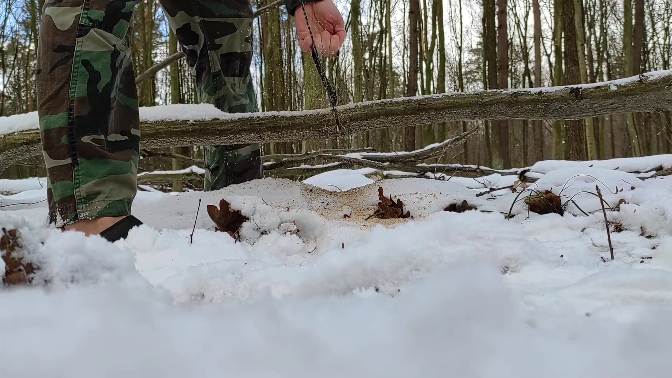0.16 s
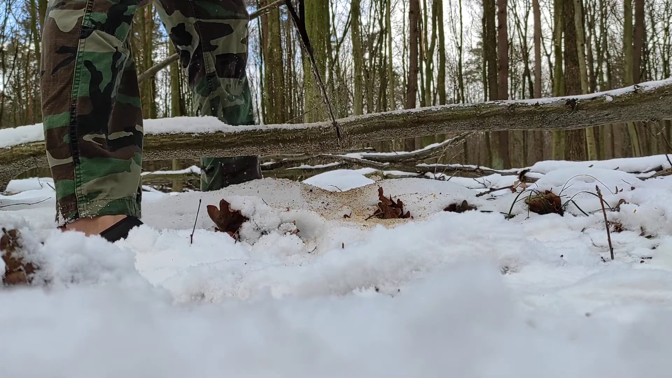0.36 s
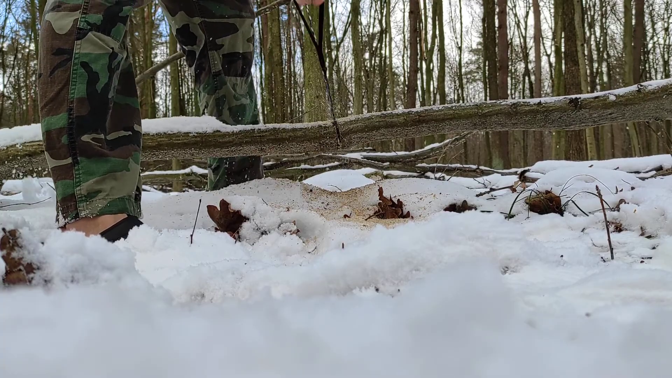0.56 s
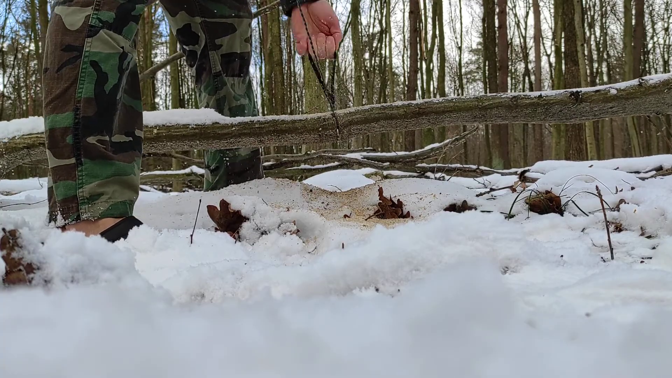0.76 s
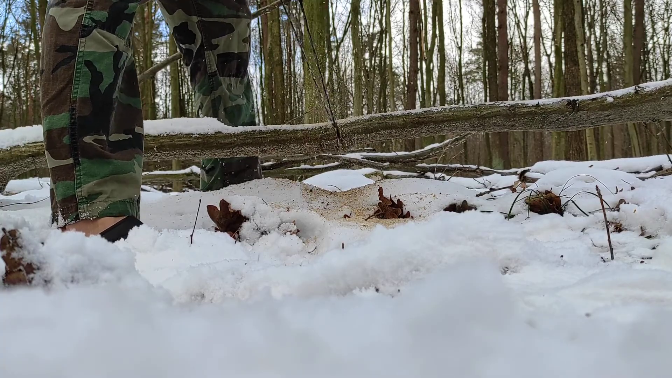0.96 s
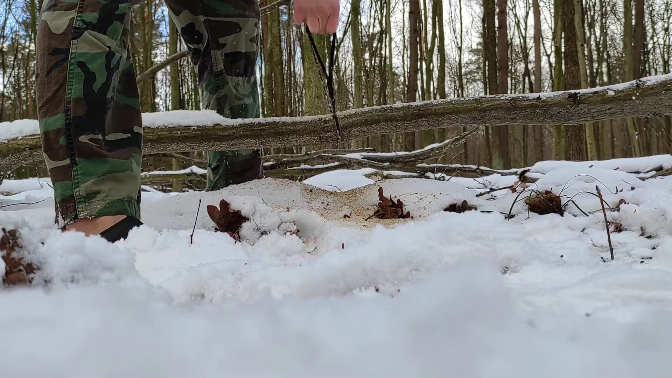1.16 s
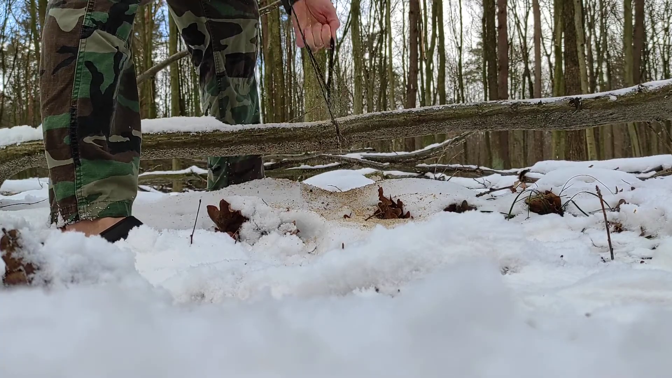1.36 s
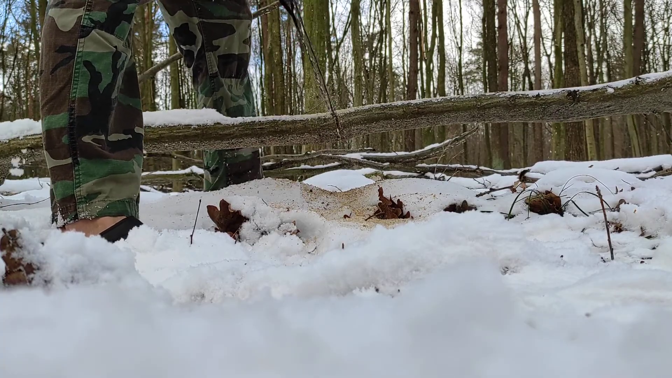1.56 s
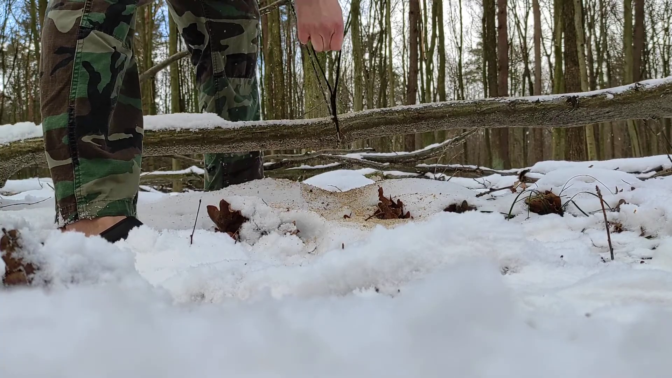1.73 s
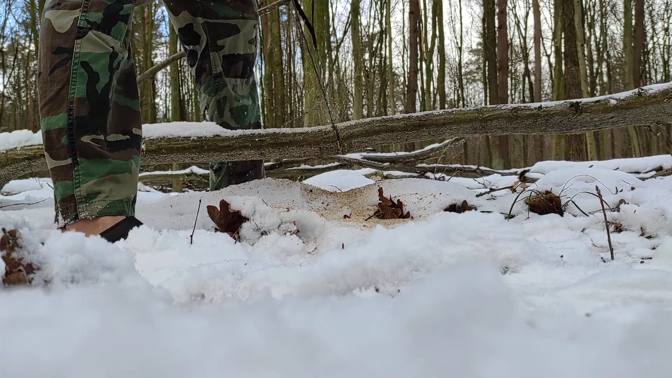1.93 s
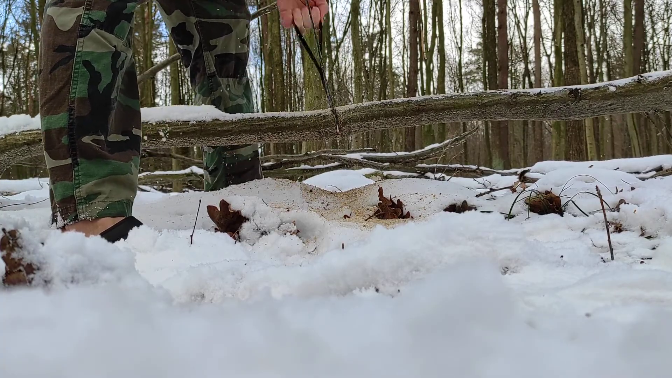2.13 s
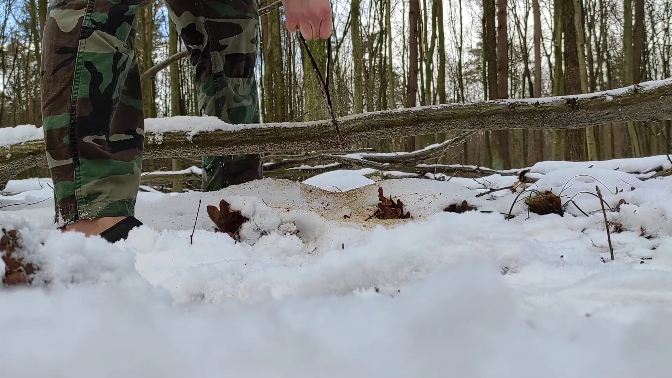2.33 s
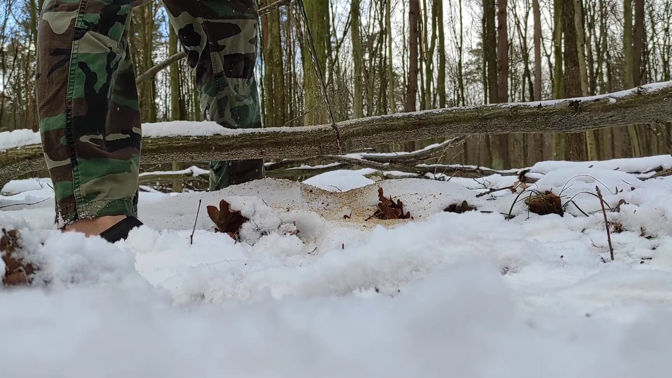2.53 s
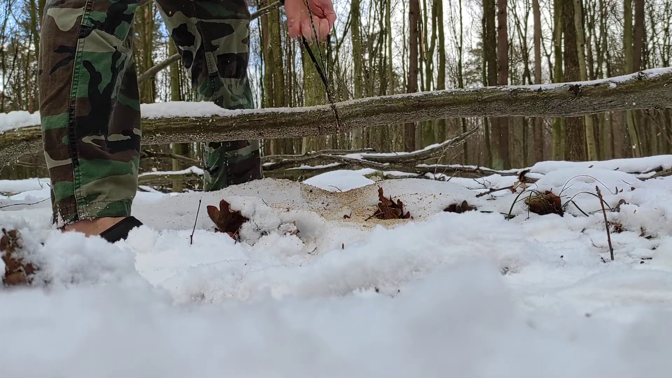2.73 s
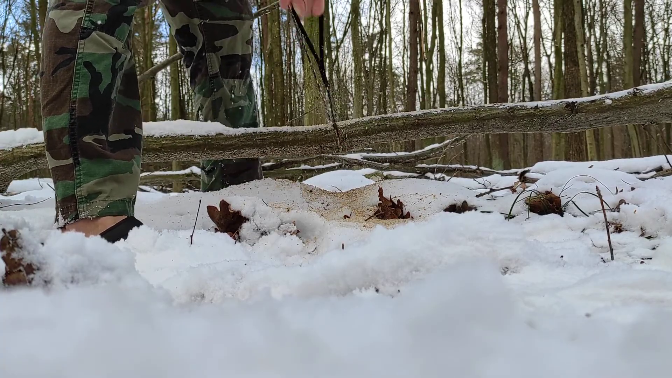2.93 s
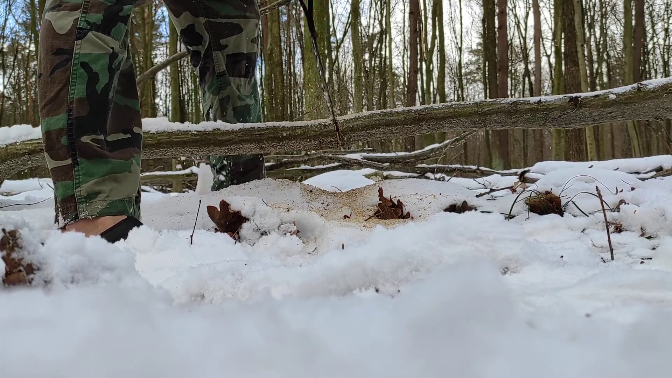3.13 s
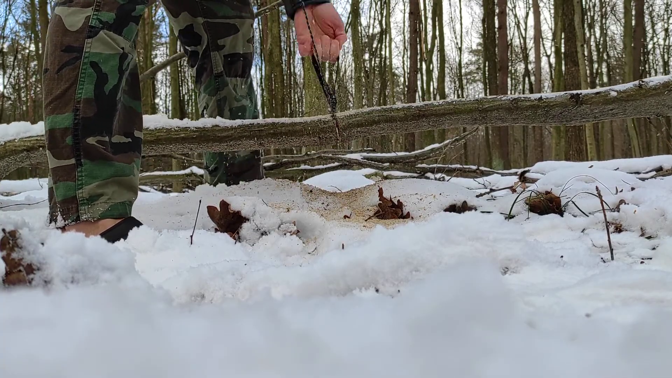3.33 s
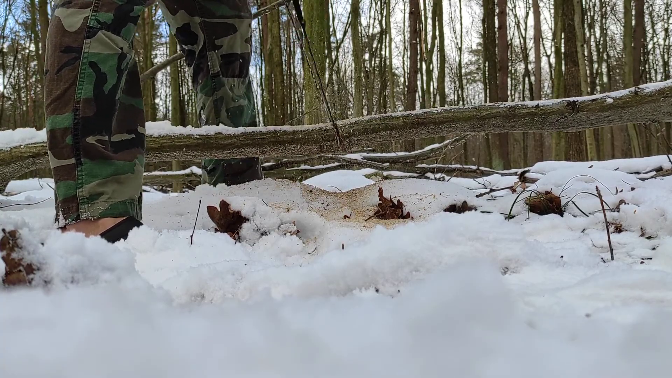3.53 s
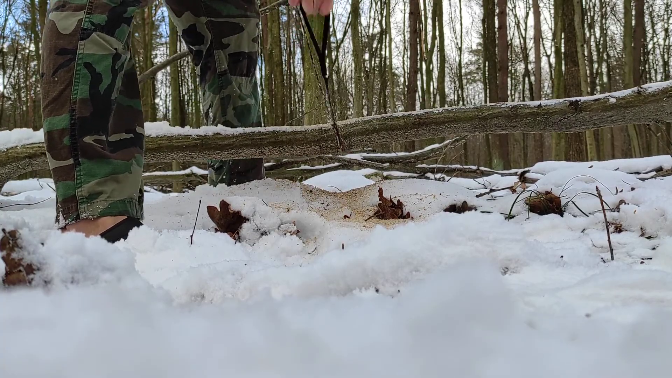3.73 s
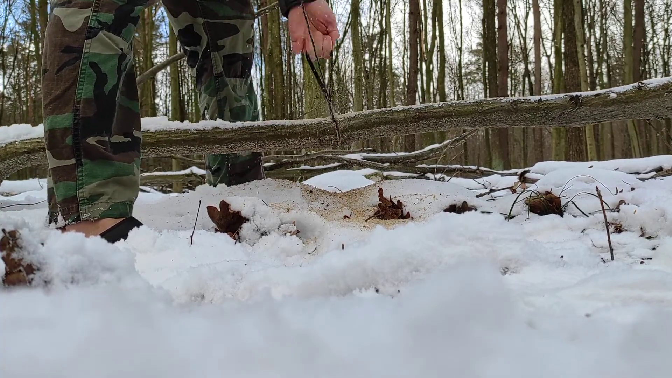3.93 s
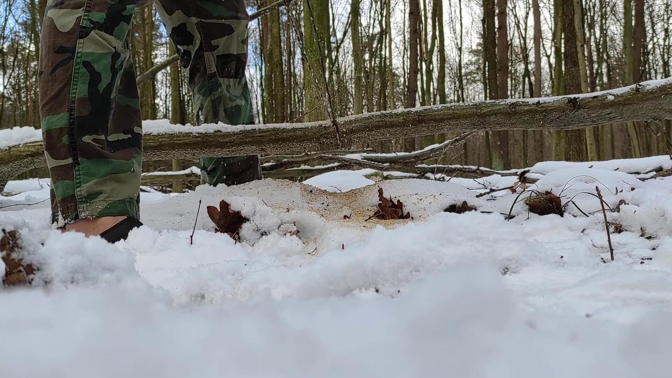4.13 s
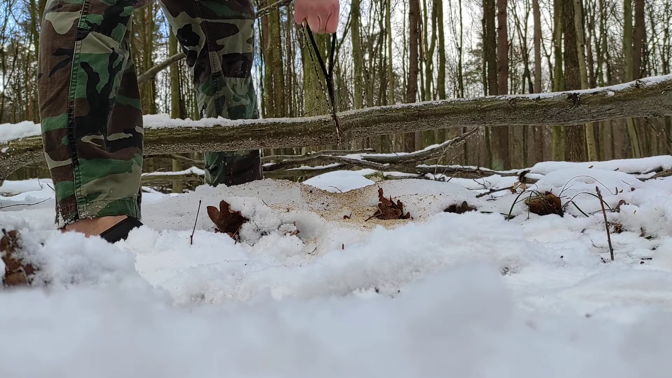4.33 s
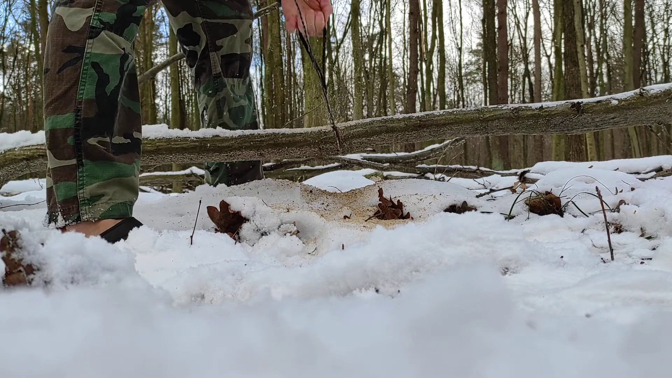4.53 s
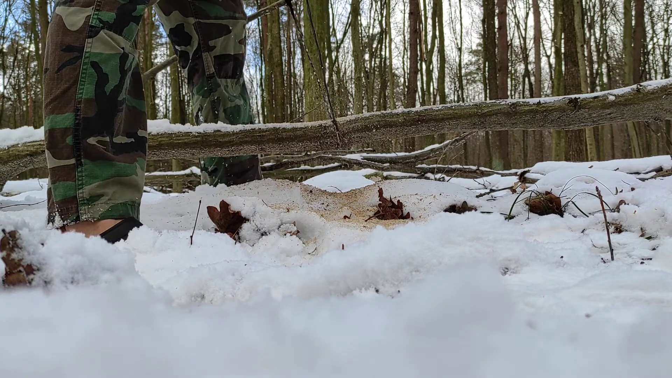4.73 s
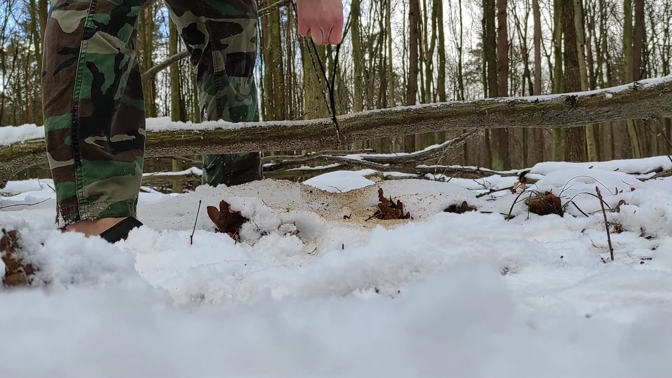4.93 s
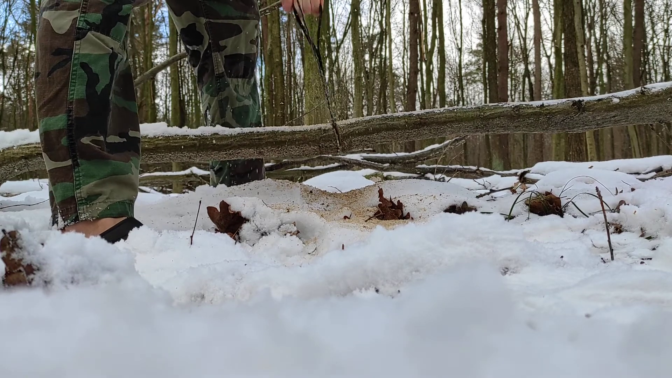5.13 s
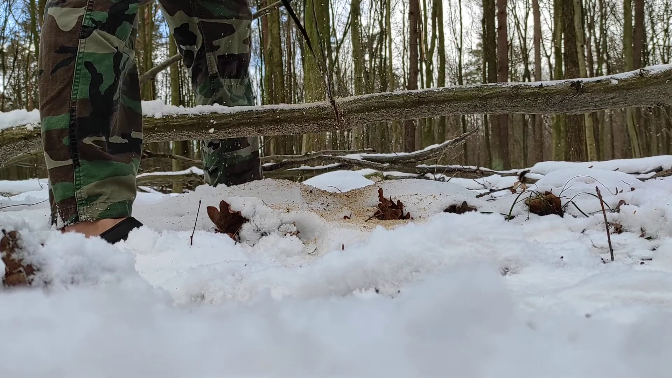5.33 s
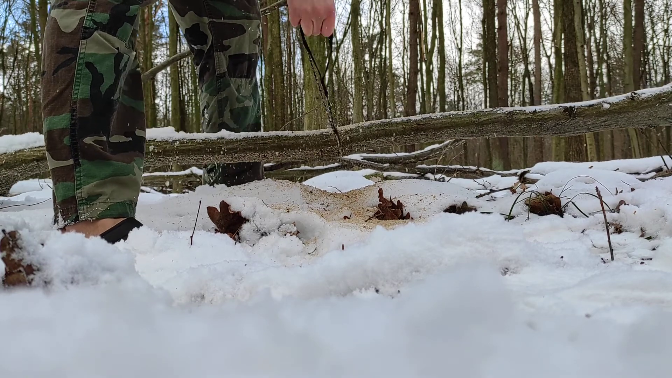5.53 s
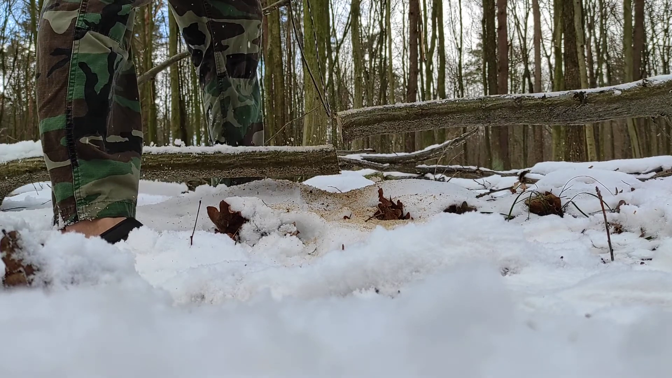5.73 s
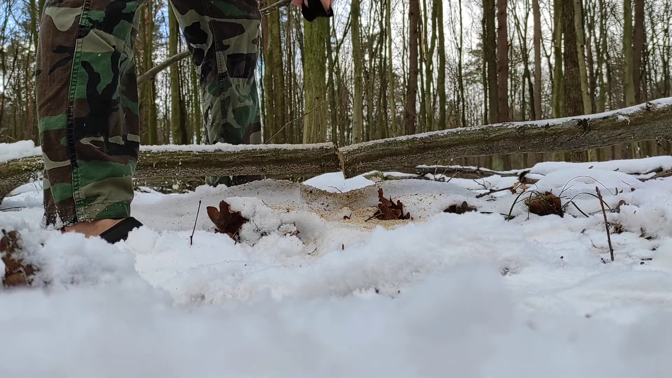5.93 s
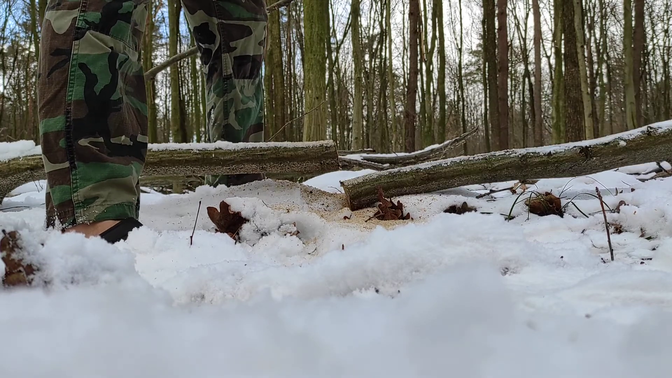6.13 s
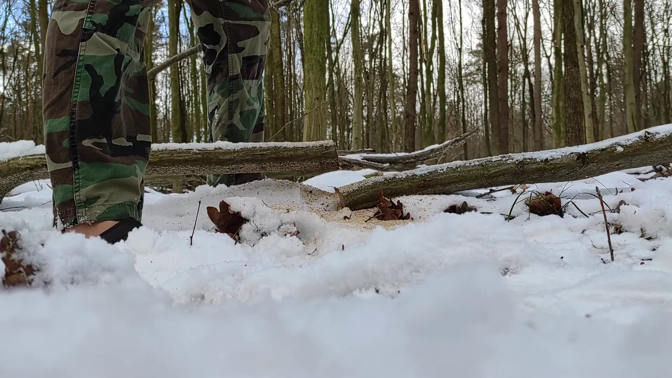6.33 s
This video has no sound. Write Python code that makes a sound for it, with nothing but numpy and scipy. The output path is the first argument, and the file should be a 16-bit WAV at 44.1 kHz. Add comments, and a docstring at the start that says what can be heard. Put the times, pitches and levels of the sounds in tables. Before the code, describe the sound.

Close by in a quiet snowy forest, a hand-pulled chain saw cuts a dead log in regular strokes, about three a second. Each pull swells as a buzzing rasp over a hollow low woody thrum, with high steel ringing and irregular sharp clinks of snagging links. Near six seconds the wood cracks and splinters, and the freed log lands with dull knocks and soft snow puffs.

```python
"""A buzzing, rasping hand chain saw is pulled to and fro through a dead log, three strokes a second.
One train of teeth, faster in mid-stroke, drives the log's thrum, noise of torn fibres and ringing steel links.
Caught links snap free with clinks; at last dry cracks, splintering, knocks and snow puffs end the cut.
Noise bursts, damped sines and shaped noise make these events, over faintly stirring forest air."""
import sys
import numpy as np
from scipy import signal
from scipy.fft import rfft, irfft, next_fast_len
from scipy.io import wavfile
from scipy.ndimage import uniform_filter1d, map_coordinates

SR = 44100
rng = np.random.default_rng(int(sys.argv[2]) if len(sys.argv) > 2 else 0)


def wav_record(signal):
    """Record a signal, one row per channel, as 16-bit PCM in the file named by sys.argv[1]."""
    frames = np.transpose(np.atleast_2d(signal))
    bounded = np.clip(frames, -1, 1)
    # unit amplitude maps onto the largest positive 16-bit level
    quanta = np.round(bounded * 32767).astype(np.int16)
    wavfile.write(sys.argv[1], SR, quanta)


N = 285325

# all levels and gains below are relative until the layers are mixed
FREE_S, SETTLE_DB_PER_S = 6.0, 71  # the freed chain comes to rest

# pulls: start_s, length_s, hardest_moment [share of length], chain_level_db, log_level_db, log_pitch_hz
PULLS = [(-.035, 0.2478, 0.505, -29, -33, 305.2), (.292, 0.23, 0.47, -30.5, -31.5, 315),
         (.594, 0.25, 0.527, -30.5, -33.5, 300), (.919, 0.23, 0.516, -29.5, -32, 305),
         (1.237, 0.24, 0.453, -30, -32.5, 304.7), (1.56, 0.22, 0.54, -29.5, -30, 299.9),
         (1.862, 0.24, 0.51, -30.5, -32, 314.2), (2.197, 0.23, 0.43, -29, -30.5, 298.2),
         (2.492, 0.24, 0.53, -30, -32.5, 299.5), (2.825, 0.227, 0.568, -30, -32.5, 305),
         (3.12, .25, .64, -31.5, -33.5, 298.1), (3.465, 0.23, 0.449, -31.5, -34, 309.8),
         (3.774, 0.2294, 0.6, -30.5, -34.5, 300.1), (4.08, 0.25, 0.56, -32.5, -35.5, 305.4),
         (4.395, 0.25, 0.5574, -31.5, -35, 294.5), (4.703, 0.2539, 0.68, -31, -33, 300.2),
         (5.012, 0.2666, 0.63, -31, -35.5, 295.3), (5.343, 0.2655, 0.53, -32.5, -36, 290.2),
         (5.66, 0.111, .9, -45, -46.5, 279.8), (5.93, 0.092, .26, -47, -52, 270.6)]
# deepening cut, chain slows: time_s, full_speed_teeth_per_s, fibre_rasp_over_chain_db
CUT_PROGRESS = [(0, 338.8, -7), (1.8, 316.4, -7.5), (3.7, 305.5, -9.5), (4.6, 261.3, -11),
                (5.45, 255, -11.5), (5.95, 201, -6)]
# teeth chatter over hard fibres: start_s, end_s
CHATTER_SPELLS = [(2.87, 2.98), (3.53, 3.63), (4.7, 4.77), (5.7, 5.8)]
# ring of the steel links: frequency_hz, gain_db
LINK_SPECTRUM = [(800, -79), (3500, -33.5), (5500, -21.5), (6300, -16.5), (7100, -4.5), (7750, 1.5),
                 (8400, -6.5), (8850, -26), (9080, -13), (9650, -35.5), (11300, -37), (12300, -33),
                 (13400, -43), (15500, -40)]
# torn fibres: frequency_hz, gain_db
FIBRE_SPECTRUM = [(40, -55), (400, -17.5), (750, -2.5), (1150, -1), (1600, -6), (2200, -5.5), (2600, -9.5),
                  (3100, -11.5), (4600, -13.5), (6000, -11), (7800, -16), (13000, -33.5)]


def sawing():
    """One train of teeth drives the log, the tearing fibres and the links."""
    start_s, _, _, chain_db, log_db, _ = np.transpose(PULLS)
    cut_s, _, fibre_db = np.transpose(CUT_PROGRESS)
    rasp_db = chain_db + np.interp(start_s, cut_s, fibre_db)
    thrum_gain = pulled(log_db, start_db=18.4, end_db=8.7, lag=.054, attack_s=.019, release_s=.085, rest_db=-49.5)
    rasp_gain = pulled(rasp_db, start_db=11, end_db=12, lag=0, attack_s=.27, release_s=.15, rest_db=-64.5)
    ring_gain = pulled(chain_db, start_db=13.3, end_db=13.9, lag=.005, attack_s=.0132, release_s=.0076, rest_db=-56)

    speed, teeth_s = chain_motion()
    depth = np.clip(rng.standard_normal(len(teeth_s)), -1.5, 1.5)
    jamming = np.clip(wobble(rate_hz=55), -2, 1.5)  # chips jam and clear in the cut
    sliding = chatter_slide()

    rasp = fibre_rasp(teeth_s, depth, speed, jamming)
    chips = torn_chips(teeth_s)
    ring = link_ring(teeth_s, depth, speed, jamming)
    thrum = log_thrum(teeth_s, depth, speed, thrum_gain)
    fibres = rasp_gain * (amp(-1.0) * sliding * rasp + chips)
    links = ring_gain * sliding * (amp(-0.9) * ring + nicks(teeth_s))
    return thrum + fibres + links


def pulled(peak_db, start_db, end_db, lag, attack_s, release_s, rest_db):
    """Gain of one voice: teeth take hold, swell to the hardest moment, ease off and let go.

    start_db and end_db lie under the peak; lag is a share of the pull; attack and release take 20 dB.
    """
    swell_power = 1.74  # roundness
    t = np.arange(N) / SR
    # the chain shifts in the cut between pulls
    power = amp(rest_db - SETTLE_DB_PER_S * np.maximum(t - FREE_S, 0)) ** 2
    for (start_s, length_s, hardest, *_), db in zip(PULLS, peak_db):
        progress = (t - start_s) / length_s
        apex = np.clip(hardest + lag, .1, .9)
        rising = progress < apex
        from_apex = np.abs((progress - apex) / np.where(rising, apex, 1 - apex))
        sag_db = np.where(rising, start_db, end_db) * from_apex ** swell_power
        before = np.maximum(start_s - t, 0) / attack_s
        after = np.maximum(t - start_s - length_s, 0) / release_s
        power = power + amp(np.maximum(db - sag_db - 20 * (before + after), -200)) ** 2
    return np.sqrt(power)


def chain_motion(slowest=.27, arch=.85, wander=.055, turn_lead_s=.032):
    """The chain turns just before each pull and speeds up unevenly; a tooth bites at each pitch passed."""
    t = np.arange(N) / SR
    turns_s = np.transpose(PULLS)[0] - turn_lead_s
    cut_s, teeth_per_s, _ = np.transpose(CUT_PROGRESS)
    stroke = np.interp(t, np.append(turns_s, FREE_S + turn_lead_s), np.arange(len(turns_s) + 1))
    speed = slowest + (1 - slowest) * np.abs(np.sin(np.pi * stroke)) ** arch  # share of full speed
    drag = 1 + wander * wobble(rate_hz=35)
    travel = np.cumsum(np.interp(t, cut_s, teeth_per_s) * speed * drag) / SR  # in tooth pitches
    return speed, np.flatnonzero(np.diff(np.floor(travel))) / SR


def bites(times_s, depth, jitter_s, spread_db):
    """Impulses at the teeth, uneven in time and sized by the depth of each bite."""
    late, own = rng.standard_normal((len(times_s), 2)).T
    return impulses(times_s + jitter_s * late, amp(spread_db * (depth + 0.78 * own)))


def chatter_slide(skip_db=4.5):
    """A chattering chain skips, so the sliding between its catches is quieter and stutters."""
    t = np.arange(N) / SR
    spells = sum(1. * ((t > start_s) & (t < end_s)) for start_s, end_s in CHATTER_SPELLS)
    skipping = uniform_filter1d(spells, size=600)
    return amp(skip_db * skipping * (np.clip(wobble(rate_hz=160), -2, 1) - 1))


# log driven by the teeth while stiff: frequency_hz, gain_db
STIFF_LOG_SPECTRUM = [(50, -44.5), (95, -23), (145, -9), (240, -4), (295, 4.5), (365, 2), (430, -2.5),
                      (484, 2.5), (560, -2.5), (630, -1.5), (760, -13), (860, -11.5), (1100, -13),
                      (2000, -28.5), (6000, -84.5)]
# log driven by the teeth when nearly cut through: frequency_hz, gain_db
WEAK_LOG_SPECTRUM = [(50, -43), (100, -13.5), (140, 3.5), (215, -4), (290, 8), (390, 2.5), (480, 3),
                     (600, -4), (800, -11), (1100, -10), (2000, -34), (6000, -70)]


def log_thrum(teeth_s, depth, speed, gain):
    """The teeth push and grind the log; its voice arches with each pull and changes as the cut weakens it."""
    reference_hz, slack_sag, pitch_wander = 295, .2, .07
    grind_share = 0.91
    t = np.arange(N) / SR
    start_s, length_s, *_, pitch_hz = np.transpose(PULLS)
    pitch = np.interp(t, start_s + length_s / 2, pitch_hz) / reference_hz
    pitch = pitch * (1 - slack_sag * (1 - speed)) * (1 + pitch_wander * wobble(rate_hz=28))
    log_clock_s = np.cumsum(pitch) / SR  # the log's vibration runs faster or slower with its pitch

    push = bites(np.interp(teeth_s, t, log_clock_s), depth, jitter_s=.00025, spread_db=2.5)
    grind = unit_rms(fading(push, life_s=0.009) * noise())
    push_ac = unit_rms(push - uniform_filter1d(push, size=600))
    drive = push_ac * [[1], [.5]] + grind_share * grind

    def voice(spectrum):
        """The driven log, read back on its own clock."""
        return np.array([map_coordinates(v, [log_clock_s * SR], order=1) for v in coloured(drive, spectrum)])

    cut = np.interp(t, [3.3, 4.7], [0, 1])
    mixed = (1 - cut) * voice(STIFF_LOG_SPECTRUM) + cut * voice(WEAK_LOG_SPECTRUM)
    thrum = steady(patchy(mixed, depth_db=3, size=1024, count=3, order=5))

    # the low bending modes ring on after each stroke
    swell = np.sqrt(fading(gain ** 2, life_s=0.1011) / (.08 * SR))
    swell = swell * amp(-SETTLE_DB_PER_S * np.maximum(t - FREE_S, 0))
    bending_spectrum = [(60, -47.5), (115, -20.5), (142, -2.5), (180, 0.0), (225, -1.0), (330, -30.0), (1500, -74)]
    bending = unit_rms(coloured(noise(), bending_spectrum))
    return amp(-.5) * gain * thrum + amp(-13.5 + 3.88 * cut) * swell * bending


def fibre_rasp(teeth_s, depth, speed, jamming):
    """Noise of tearing: a fast chain strikes tooth by tooth, a slow one only slides."""
    strikes = unit_rms(fading(bites(teeth_s, depth, jitter_s=.0005, spread_db=3), life_s=.0016))
    tear = (speed * strikes + .5) * noise()
    tear = patchy(tear, depth_db=3, size=1024, count=3, order=9)
    tear = patchy(tear, depth_db=3, size=256, count=4, order=4)
    rasp = steady(coloured(seated(tear), FIBRE_SPECTRUM))
    return rasp * amp(1.2 * jamming + 0.38 * wobble(rate_hz=90))


# narrow resonances of log and taut chain: frequency_hz, strength_db
BODY_MODES = [(857.6, 7), (1087.4, 1), (2190, 0), (2800, 5), (3380, 0.5), (3760, 5), (4030, 0), (4345, 3),
              (4770, 2.5), (5130, -1)]


def seated(x, shift_share=.007, strength_spread_db=4, q=50):
    """x through the resonances of log and chain, which each pull seats anew in pitch and strength."""
    edges = [0, *(np.transpose(PULLS)[0][1:] * SR).astype(int), N]
    mode_hz, mode_db = np.transpose(BODY_MODES)
    out = np.zeros((2, N + SR))
    f = np.fft.rfftfreq(SR, 1 / SR)[:, None]
    for a, b in zip(edges, edges[1:]):
        shift, loud = np.clip(rng.standard_normal((2, len(mode_hz))), -1.5, 1.5)
        centre_hz = mode_hz * (1 + shift_share * shift)
        loss = 1j * f * centre_hz / q
        resonances = amp(mode_db + strength_spread_db * loud) * loss / (centre_hz ** 2 - f ** 2 + loss)
        response = 1 + np.sum(resonances, axis=1)
        out[:, a:a + SR] += irfft(rfft(x[:, a:b], SR) * response, SR)
    return out[:, :N]


def torn_chips(teeth_s, level_db=-0.5, chatter_extra_db=5.5):
    """Each tooth tears out a chip, heard as a tiny damped ring, louder in the chatter."""
    chatter = sum((teeth_s > start_s) & (teeth_s < end_s) for start_s, end_s in CHATTER_SPELLS)
    return splintered(teeth_s, amp(level_db + chatter_extra_db * chatter), 2686, life_s=0.0015, spread=0.464)


def link_ring(teeth_s, depth, speed, jamming):
    """Each tooth makes its steel link tick; sliding keeps the links ringing between bites."""
    strikes = unit_rms(fading(bites(teeth_s, depth, jitter_s=.0004, spread_db=2), life_s=.001))
    tick = (speed * strikes + .5) * noise()
    tick = patchy(tick, depth_db=3, size=1024, count=4, order=6)
    ring = steady(dispersed(coloured(tick, LINK_SPECTRUM)))
    return ring * amp(1.2 * jamming + 1.0 * wobble(rate_hz=25))


def dispersed(x, lag_s=0.001788):
    """Along the chain the highest ripples travel slowest, so every tick is a tiny rising chirp."""
    def response(hz):
        lag_share = np.clip((hz - 5000) / 3000, 0, 1.5)  # lag_s at 8 kHz, half as much again at most
        phase = 2 * np.pi * lag_s * np.cumsum(lag_share) * hz[1]
        return np.exp(-1j * phase)
    return filtered(x, response)


def nicks(teeth_s, level_db=-7.5, spread_db=4.5):
    """Clean clicks of single links on hard fibres, most faint and a few sharp."""
    sizes = amp(spread_db * np.clip(rng.standard_normal(len(teeth_s)), -2, 2))
    return amp(level_db) * unit_rms(coloured(impulses(teeth_s, sizes) * [[1], [.5]], LINK_SPECTRUM))


# a link snags and snaps free: time_s, clink_level_db, wood_level_db
SNAG_EVENTS = [(0.0556, -23, -36), (0.3378, -19, -44), (1.015, -15, -38), (1.0316, -17, -37.5),
               (1.0585, -17.5, -36.5), (1.0614, -16, -42), (1.071, -9, -31), (1.4694, -24, -44),
               (1.6561, -9, -37.5), (1.9738, -17, -33), (2.2047, -19.5, -44.5), (2.2335, -16, -37),
               (2.2618, -14, -38), (2.3, -19, -40), (2.3745, -12.5, -38.5), (2.4135, -19.5, -42),
               (2.8174, -27, -50), (2.8722, -16.5, -38), (2.9241, -15.5, -33), (2.9491, -13, -34),
               (2.966, -11, -35), (2.9758, -9, -36.5), (3.4755, -27, -43), (3.5428, -9, -31),
               (3.5684, -14, -35), (3.5926, -12, -36), (3.6097, -17, -40), (3.619, -15.5, -36),
               (3.6455, -15, -39), (3.9316, -15, -33), (4.0014, -16, -52.5), (4.098, -26, -47),
               (4.1648, -12.5, -31), (4.2157, -14.5, -32.5), (4.2693, -14, -39), (4.3052, -23, -43.5),
               (4.6991, -21, -46), (4.7231, -18.5, -48.5), (4.7576, -16, -42), (4.789, -18, -38),
               (5.0144, -30, -52), (5.163, -12, -41), (5.19, -13, -43.5), (5.2815, -15, -37),
               (5.3395, -25, -48), (5.407, -17, -43), (5.4385, -18, -40.5), (5.5528, -15, -46.5),
               (5.7483, -20, -42), (6.105, -15, -46), (6.119, -31, -60), (6.3409, -34, -75.5),
               (6.4128, -35, -60)]
# dry click of wood: frequency_hz, gain_db
CLICK_SPECTRUM = [(500, -16), (5600, 1), (8000, -4), (10500, -27)]


def snags():
    """A caught link snaps free: one sharp clink, a brief rattle, a dry click of wood and a little splintering."""
    snap_db, rattle_db, click_db, splinter_db = 22, 20.5, 27.5, 28.5
    time_s, clink_db, wood_db = np.transpose(SNAG_EVENTS)
    snap = impulses(time_s + .0006, amp(clink_db)) * [[1], [.3]]
    click = impulses(time_s + .0006, amp(wood_db)) * [[1], [.3]]
    rattle = bursts(zip(time_s + .001, clink_db), life_s=.00163)
    splinters = bursts(zip(time_s, wood_db), life_s=.0018)
    steel = coloured(amp(snap_db) * snap + amp(rattle_db) * rattle, LINK_SPECTRUM)
    wood_click = amp(click_db) * coloured(click, CLICK_SPECTRUM)
    return steel + wood_click + amp(splinter_db) * coloured(splinters, FIBRE_SPECTRUM)


# fibres and twigs break: time_s, level_db
CRACK_EVENTS = [(5.709, -47), (5.753, -40), (5.757, -39.5), (5.776, -48), (5.798, -41), (5.8135, -38),
                (5.941, -43.5), (6.225, -47.5)]


def cracks():
    """Breaking fibres and twigs: very short puffs of broadband noise."""
    spectrum = [(100, -9.0), (700, 7.0), (3000, -9.5), (8000, 8.0), (10000, -12), (15000, -24)]
    return amp(23.5) * coloured(bursts(CRACK_EVENTS, life_s=.001), spectrum)


# log shifts, gives way and lands: time_s, knock_level_db, knock_pitch_hz, log_ring_level_db, snow_puff_level_db
THUD_EVENTS = [(1.866, -30, 480, -47.5, -61.5), (2.395, -37.5, 180, -40, -63.5),
               (5.668, -36, 212, -50, -60), (5.791, -31, 900, -41.5, -48), (5.7998, -29, 332, -42, -49),
               (5.813, -25, 270, -38, -44), (6.122, -26, 385, -46, -35), (6.150, -24.5, 439, -45, -40),
               (6.162, -23, 305, -45, -40), (6.198, -39, 170, -45.5, -60), (6.25, -40, 289, -53, -58)]
# log ringing after a blow: frequency_hz, level_db, t60_s
LOG_RING_MODES = [(157, 0, 0.32), (211.2, 0, 0.16), (368, -6, 0.4), (430, -10, 0.11), (792, -14.5, .07),
                  (918, -17, 0.061), (1060, -15.5, 0.055)]


def thuds():
    """Dull knocks of the falling log, its modal ring, the frozen ground's boom and puffs of snow."""
    knock_t60_s, attack_s = 0.046, 0.002
    ground_hz, ground_db, ground_t60_s = 68.8, -5, 0.3
    t = np.arange(SR // 2) / SR

    def damped(hz, db, t60_s):
        """Decaying sine."""
        return amp(db - 60 * t / t60_s) * np.sin(2 * np.pi * hz * t)

    ring = sum(damped(hz, db, t60_s) for hz, db, t60_s in LOG_RING_MODES)
    boom = damped(ground_hz, ground_db, ground_t60_s)
    onset = 1 - np.exp(-t / attack_s)
    knocks = np.zeros(N + SR)
    for time_s, knock_db, knock_hz, ring_db, puff_db in THUD_EVENTS:
        blow = damped(knock_hz, knock_db, knock_t60_s) + amp(ring_db) * ring + amp(puff_db) * boom
        knocks[round(time_s * SR):][:len(t)] += blow * onset
    puffs = bursts([(time_s, puff_db) for time_s, *_, puff_db in THUD_EVENTS], life_s=0.0064)
    snow = coloured(puffs, [(30, 2), (80, 12), (450, 7.5), (1300, -10), (4000, -29), (12000, -45.5)])
    return amp(-2.5) * knocks[:N] + amp(31.5) * snow


# last fibres splinter: start_s, length_s, splinter_level_db, middle_pitch_hz
CRUNCH_EVENTS = [(5.659, .035, -52, 899.5), (5.732, 0.0347, -44.5, 4485), (5.789, .016, -42, 950),
                 (5.81, .012, -46, 1510), (5.935, .055, -51, 802)]


def crunches(splinters_per_s=1100):
    """Dense runs of woody splinters as the log tears apart."""
    out = np.zeros((2, N))
    for start_s, length_s, db, hz in CRUNCH_EVENTS:
        times_s = start_s + length_s * rng.random(int(length_s * splinters_per_s))
        out += splintered(times_s, np.full(len(times_s), amp(db)), hz, life_s=0.0013, spread=0.45)
    return out


# crumbs of bark and snow: frequency_hz, gain_db
CRUMB_SPECTRUM = [(100, -19), (400, 0), (1500, -11), (3500, -8), (7500, -4), (10000, -13), (15000, -24)]


def crumbs(start_s=5.65, end_s=6.46, crumbs_per_s=55, level_db=-34, spread_db=8):
    """Small irregular ticks of bark and snow falling as the log parts."""
    moment, size = rng.random((int(crumbs_per_s * (end_s - start_s)), 2)).T
    times_s = np.interp(moment, [0, 1], [start_s, end_s])
    rows = zip(times_s, level_db + spread_db * (2 * size - 1))
    return coloured(bursts(rows, life_s=0.0028), CRUMB_SPECTRUM)


def trunk_echo(x):
    """The trunks answer with a dense, fast-dying tail of echoes."""
    return amp(-21) * scattered(x, t60_s=.25)


# still forest air: frequency_hz, gain_db
AIR_SPECTRUM = [(20, -7.5), (70, 0), (150, -5), (400, -12.5), (1000, -29), (3000, -32), (7500, -19),
                (10000, -37), (16000, -47)]


def forest_air():
    """Shaped noise whose level stirs slightly."""
    return amp(-58.5 + 1.2 * wobble(rate_hz=14)) * unit_rms(coloured(noise(), AIR_SPECTRUM))


# stereo width: frequency_hz, side_minus_mid_db
WIDTH_CURVE = [(60, -14), (92, -15), (140, -12), (210, -17), (330, -8.5), (500, -1), (770, -4.5), (1170, 2),
               (1790, 5.5), (2740, 3), (4190, -1.5), (6410, -4.5), (9810, -3.5), (15000, 10)]
# stereo balance: frequency_hz, left_minus_right_db
BALANCE_CURVE = [(60, 3.5), (110, 5.5), (200, 3), (380, 4.5), (700, -1.5), (1290, 3.5), (2380, -1),
                 (4400, 0), (6500, -9), (8120, 0.5), (15000, -1)]


def spaced_pair(sound, diffuse):
    """Direct sound reaches two microphones out of step; diffuse sound differs between them."""
    diffuse = np.clip(diffuse, 0, 1)
    mid, stray = sound
    blend = np.sqrt(1 - diffuse) * mid + np.sqrt(diffuse) * stray
    side = filtered(blend, lambda hz: -1j * amp(on_log_axis(WIDTH_CURVE, hz)))
    pair = np.array([mid + side, mid - side])
    return filtered(pair, lambda hz: amp(np.outer([.5, -.5], on_log_axis(BALANCE_CURVE, hz))))


def amp(db):
    """Decibels to gain."""
    return 10 ** (np.asarray(db) / 20)


def unit_rms(x):
    """Scale to rms 1."""
    return x / np.sqrt(np.mean(x ** 2) + 1e-20)


def steady(x):
    """Scale to rms 1 over every few hundredths of a second."""
    power = uniform_filter1d(uniform_filter1d(x ** 2, size=2000), size=2000)
    return x / np.sqrt(np.abs(power) + 1e-12)


def on_log_axis(points, hz):
    """(Hz, value) points read on a log frequency axis."""
    f, v = np.transpose(points)
    return np.interp(np.log(hz + 1), np.log(f + 1), v)


def filtered(x, response):
    """x times a complex response of frequency."""
    m = next_fast_len(N + SR // 2)
    return irfft(rfft(x, m) * response(np.fft.rfftfreq(m, 1 / SR)), m)[..., :N]


def coloured(x, spectrum, size=4096):
    """Minimum-phase filter with the given spectrum: it rings only after each blow."""
    gain = amp(on_log_axis(spectrum, np.fft.rfftfreq(size, 1 / SR)))
    cepstrum = irfft(np.log(gain + 1e-6))
    cepstrum[1:size // 2] *= 2
    cepstrum[size // 2 + 1:] = 0
    kernel = irfft(np.exp(rfft(cepstrum)))
    return signal.oaconvolve(np.atleast_2d(x), kernel[None], axes=1)[:, :N]


def patchy(x, depth_db, size, count, order):
    """x with drifting patches of colour, count bins wide and order frames long, in frames of size samples."""
    z = signal.stft(x, nperseg=size)[2]
    field = uniform_filter1d(rng.standard_normal(z.shape[1:]), count, 0)
    field = uniform_filter1d(field, order, 1)
    return signal.istft(z * amp(depth_db * np.clip(unit_rms(field), -2, 2)), nperseg=size)[1][:, :N]


def impulses(times_s, sizes):
    """One impulse of each size at each time."""
    return np.bincount(np.clip(times_s * SR, 0, N).astype(int), sizes, N + 1)[:N]


def fading(x, life_s):
    """Each impulse becomes a jump that decays to 1/e in life_s."""
    return signal.lfilter([1], [1, -np.exp(-1 / (life_s * SR))], x)


def noise():
    """Two unrelated noises: one for the direct sound, one for the diffuse sound."""
    return rng.standard_normal((2, N))


def wobble(rate_hz):
    """A random curve of straight segments with rate_hz knots a second."""
    return np.interp(np.arange(N) * rate_hz / SR, np.arange(1000), rng.standard_normal(size=1000))


def bursts(events, life_s):
    """A short noise puff for each (s, dB) row, direct and diffuse, with that energy."""
    t = np.arange(SR // 20) / SR
    out = np.zeros((2, N + SR))
    for time_s, db, *_ in events:
        puff = rng.standard_normal((2, len(t))) * np.exp(-t / life_s)
        puff = puff / np.linalg.norm(puff, axis=1, keepdims=True)
        out[:, round(time_s * SR):][:, :len(t)] += amp(db) * puff
    return out[:, :N]


def splintered(times_s, sizes, hz, life_s, spread):
    """Each splinter is a tiny damped ring at a pitch of its own, direct and diffuse."""
    pitch, loud, stray = np.clip(rng.standard_normal((len(times_s), 3)), -1.8, 1.8).T
    t = np.arange(SR // 100) / SR
    pitch_hz = hz * np.exp(spread * pitch)
    peaks = sizes * amp(3.06 * loud)
    rings = peaks[:, None] * np.exp(-t / life_s) * np.sin(2 * np.pi * pitch_hz[:, None] * t)
    at = (np.round(times_s * SR).astype(int)[:, None] + np.arange(len(t))).ravel()
    return np.array([np.bincount(at, r.ravel(), N)[:N] for r in (rings, rings * stray[:, None])])


def scattered(x, t60_s):
    """x smeared by a dense tail of random echoes, a different one on each of two channels."""
    t = np.arange(SR // 2) / SR
    tail = rng.standard_normal((2, len(t))) * np.exp(-np.log(1000) * t / t60_s)
    return signal.fftconvolve(np.atleast_2d(x), tail / np.linalg.norm(tail[0]), axes=1)[:, :N]


def scene():
    """Saw and log close by, a faint answer from the trunks, and faintly stirring air."""
    near = sawing() + snags() + cracks() + thuds() + crunches() + crumbs()
    return spaced_pair(near + forest_air(), diffuse=0.69) + trunk_echo(near[0])


def record(dry, top_hz=15950):
    """The recorder keeps nothing above its band limit."""
    return filtered(dry, lambda hz: hz < top_hz)


dry = scene()
out = record(dry)
wav_record(out)
```